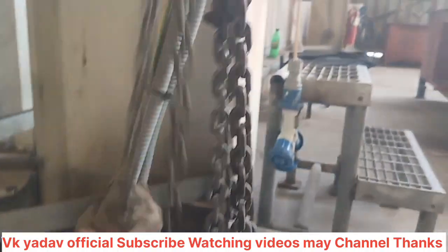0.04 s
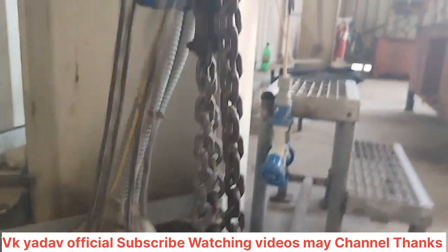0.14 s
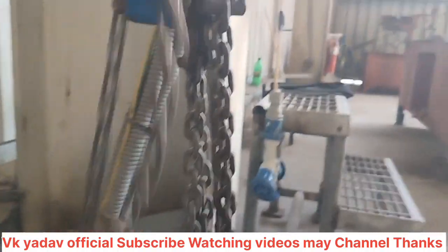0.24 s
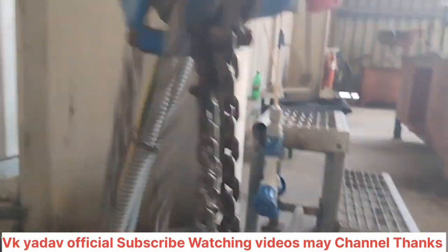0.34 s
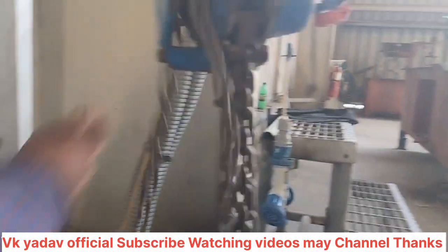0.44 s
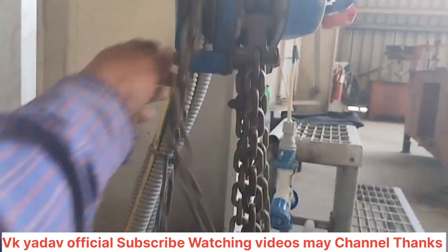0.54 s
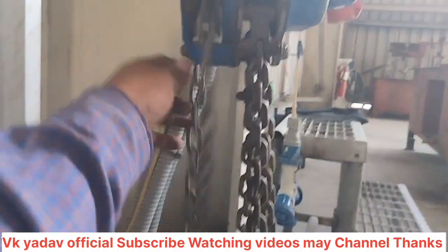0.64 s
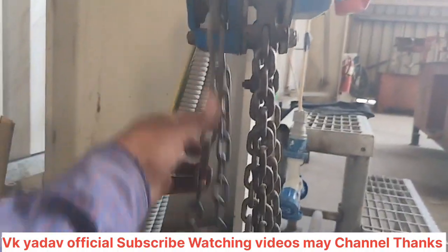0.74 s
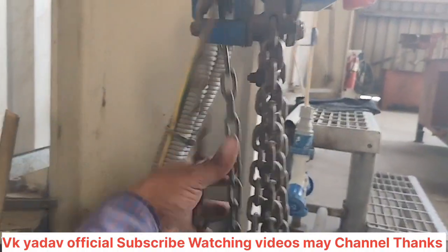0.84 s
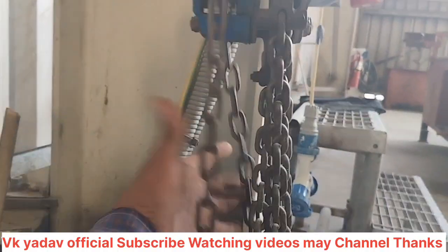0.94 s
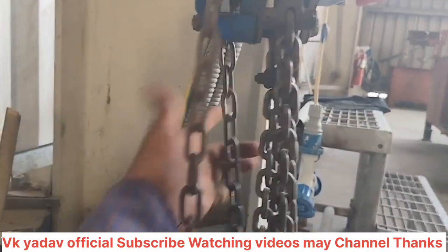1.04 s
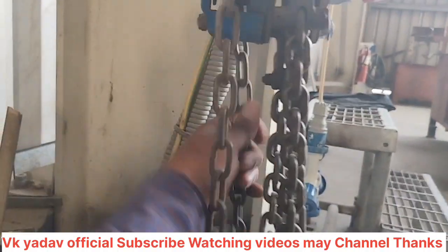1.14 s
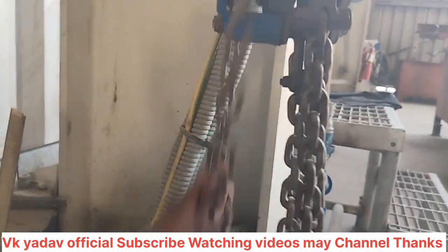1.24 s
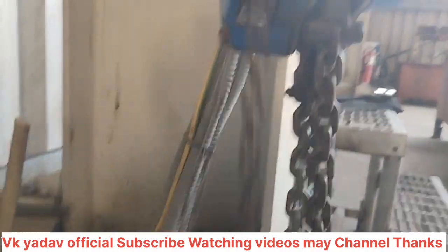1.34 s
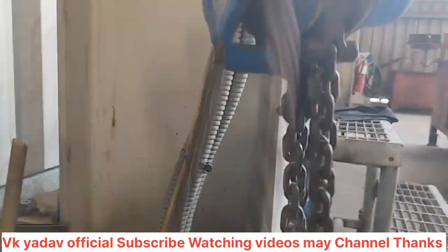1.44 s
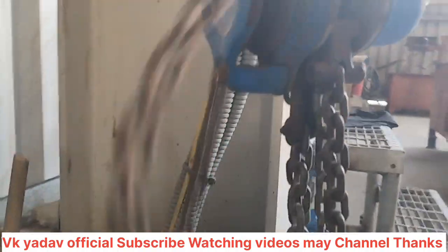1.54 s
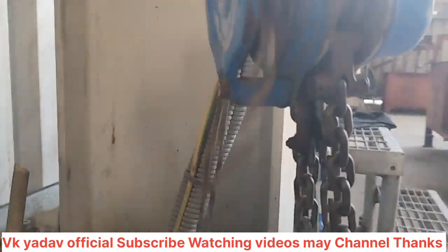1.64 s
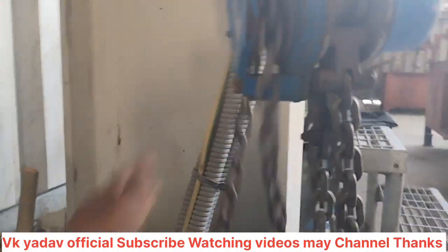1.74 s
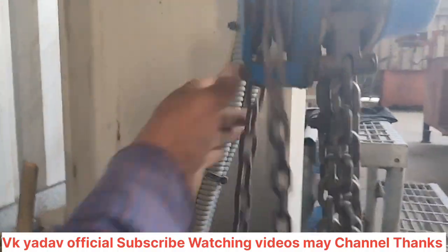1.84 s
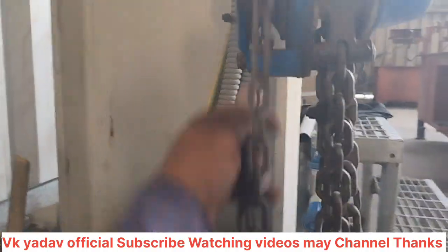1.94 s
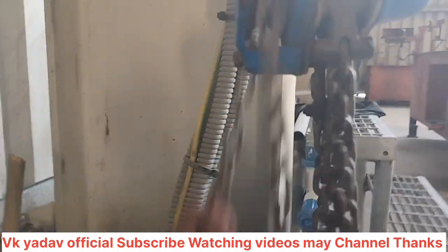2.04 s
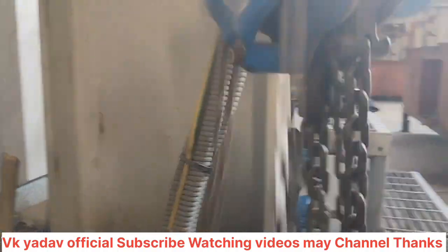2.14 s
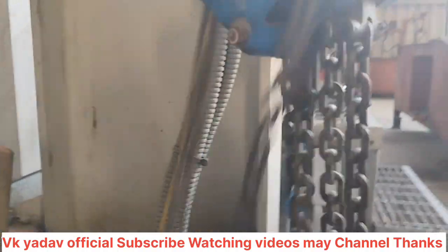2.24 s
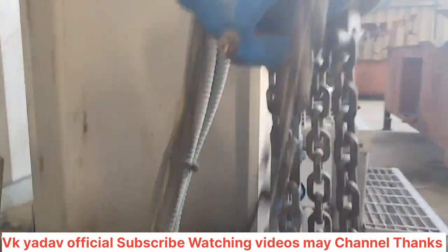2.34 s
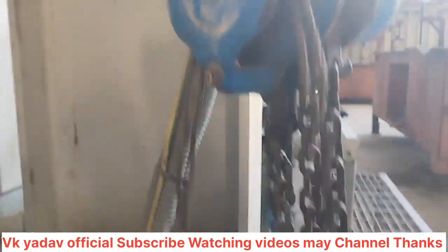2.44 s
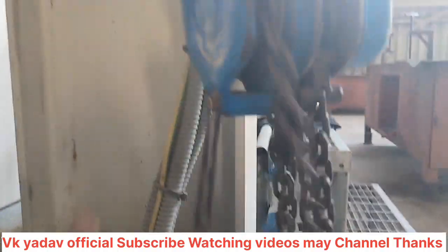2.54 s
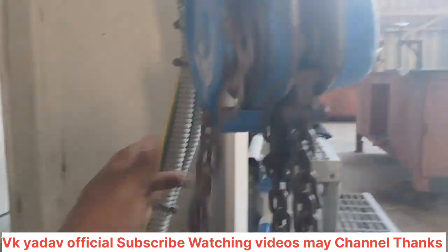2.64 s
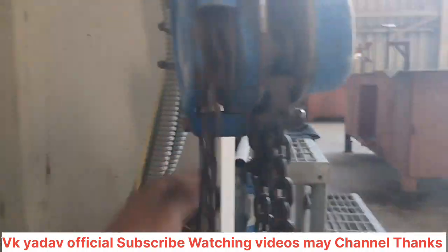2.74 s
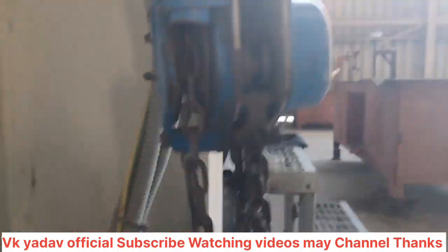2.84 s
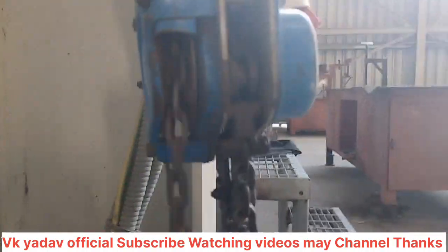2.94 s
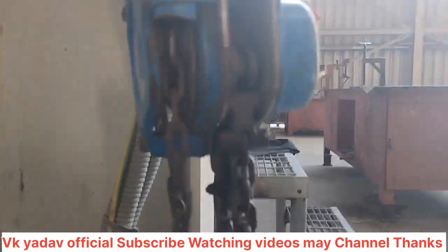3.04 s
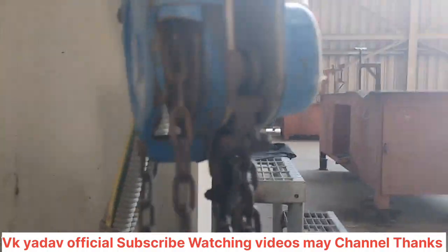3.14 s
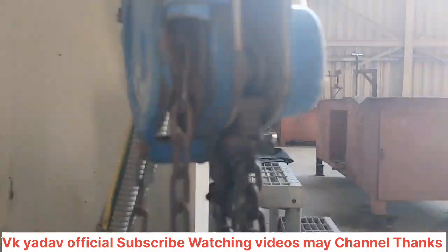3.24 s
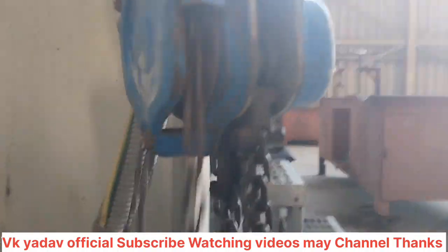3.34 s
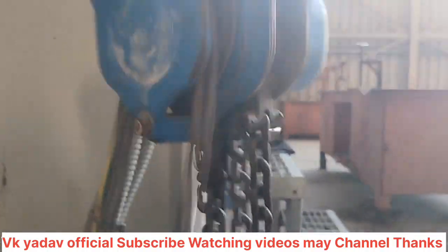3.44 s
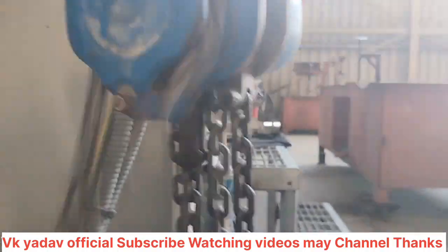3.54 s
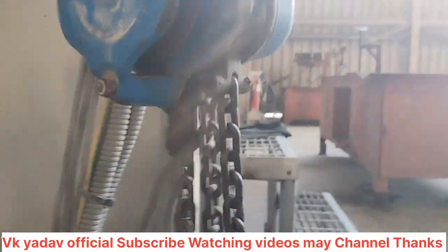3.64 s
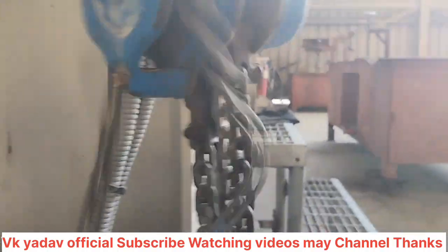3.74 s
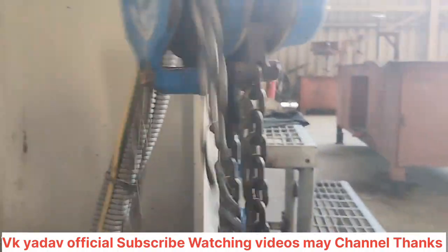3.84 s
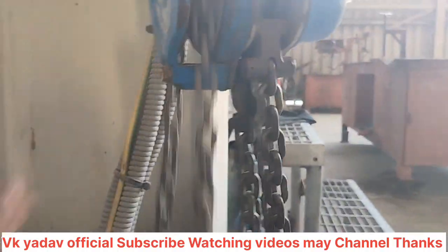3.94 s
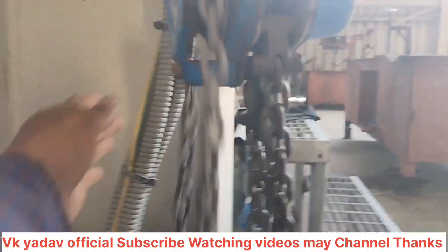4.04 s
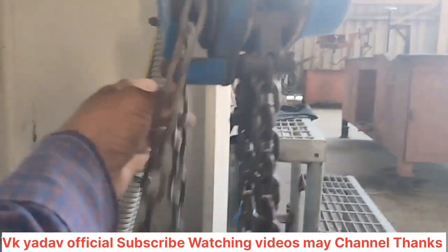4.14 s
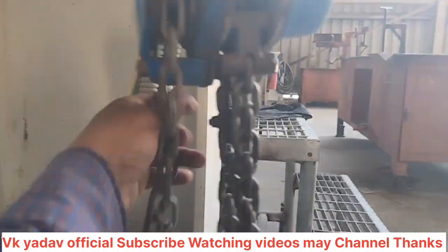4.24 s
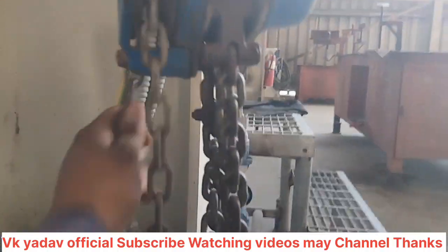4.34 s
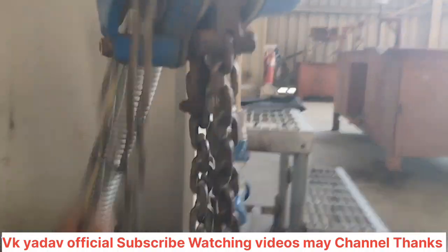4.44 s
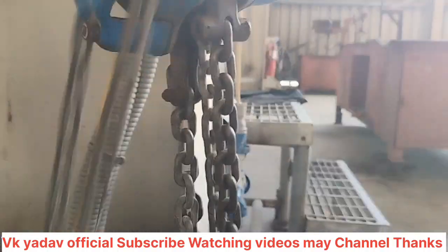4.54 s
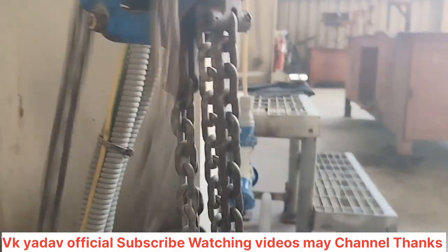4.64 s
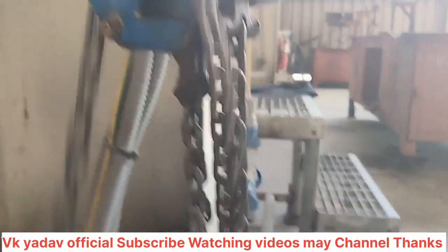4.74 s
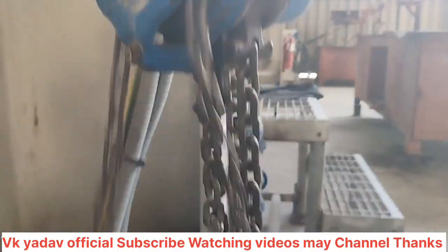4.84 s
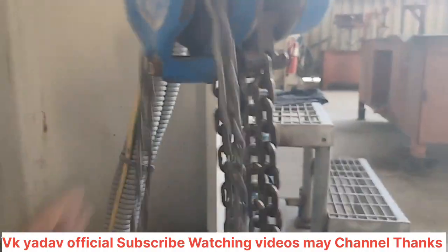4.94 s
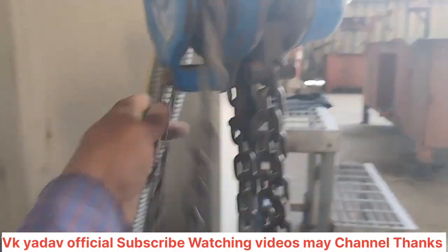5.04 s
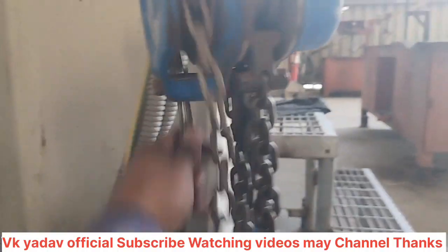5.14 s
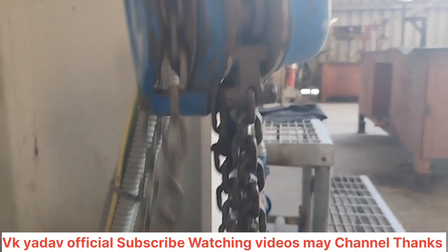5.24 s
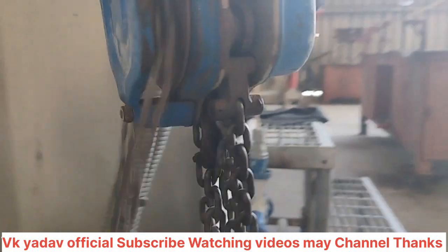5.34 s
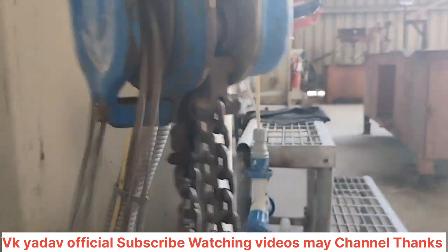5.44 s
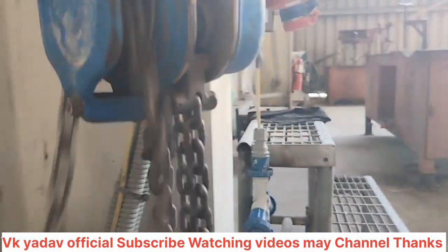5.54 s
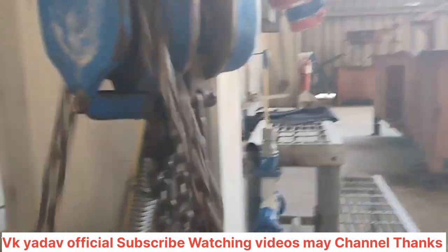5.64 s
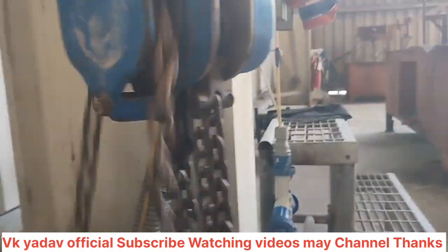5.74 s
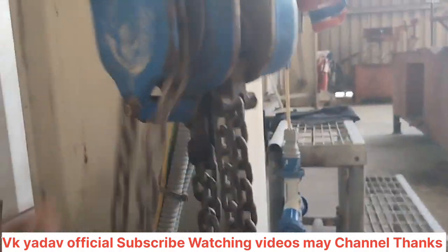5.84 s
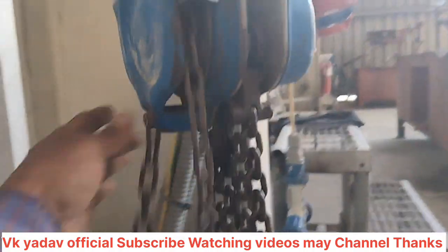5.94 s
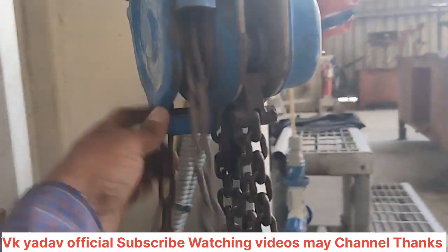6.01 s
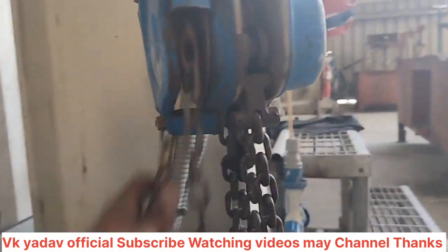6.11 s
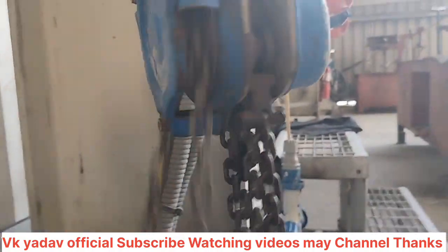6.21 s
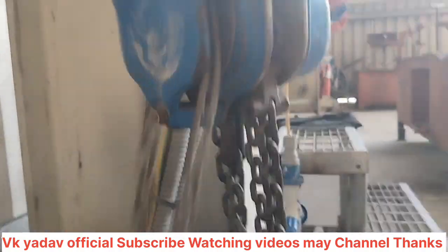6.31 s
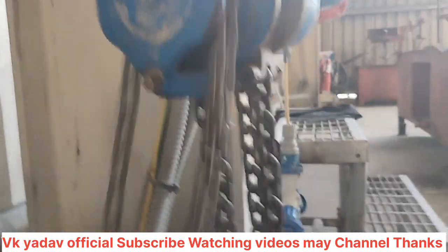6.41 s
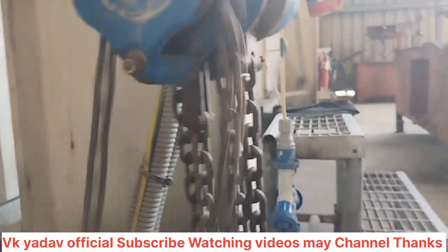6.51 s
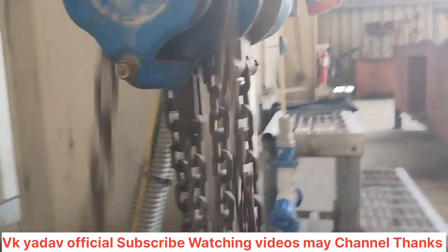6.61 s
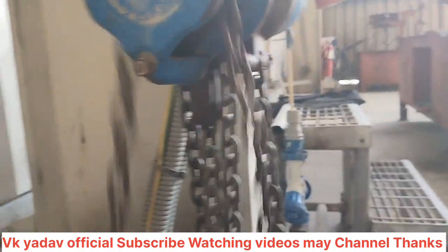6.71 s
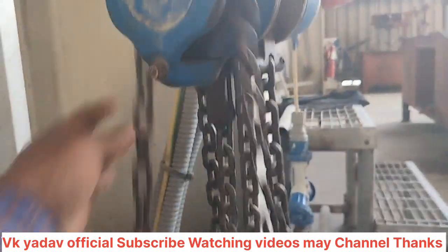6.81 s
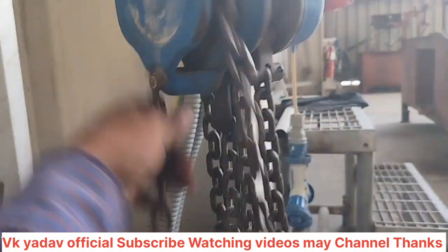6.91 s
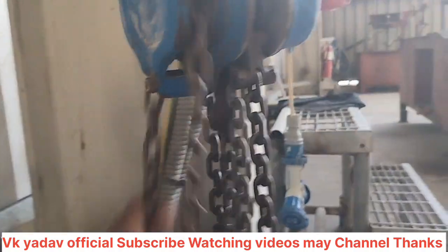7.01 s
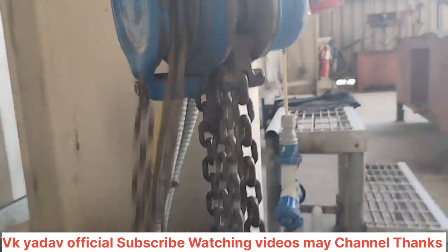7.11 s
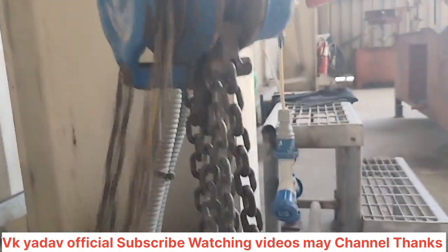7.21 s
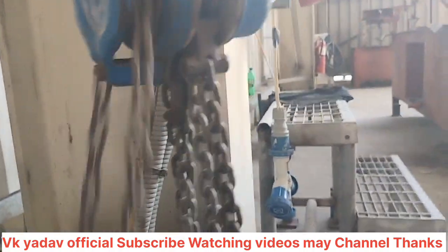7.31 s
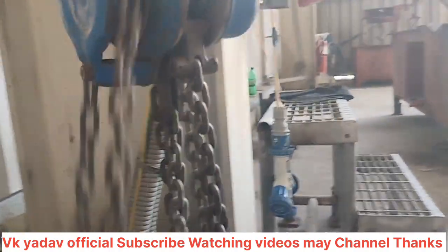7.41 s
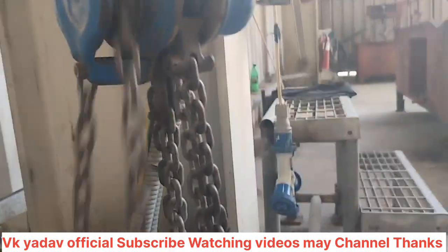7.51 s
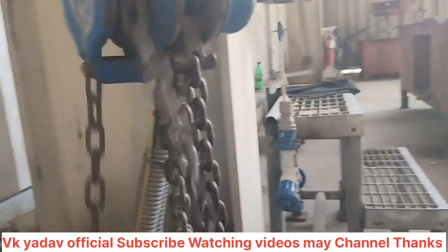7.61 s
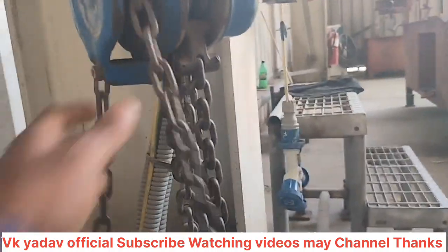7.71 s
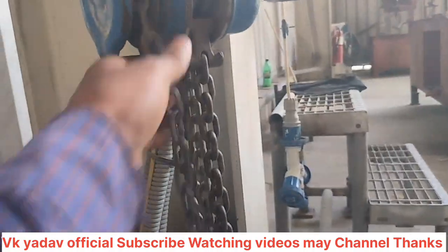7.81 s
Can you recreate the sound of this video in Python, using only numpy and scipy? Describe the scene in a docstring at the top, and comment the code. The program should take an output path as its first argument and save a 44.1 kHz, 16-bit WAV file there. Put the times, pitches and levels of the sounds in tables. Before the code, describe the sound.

A steel hand chain rattles and clinks through a manual hoist in repeated pulls, close up in a workshop.

```python
"""Hand chain on a workshop hoist

A steel chain is pulled again and again over the wheel of a manual hoist. Links clink on each other,
slap the thin wheel cover and drop into the wheel's pockets with dull thuds; far-off machines murmur.
Heard close up on a phone, the hoist nearer the left microphone. It starts abruptly out of silence."""
import sys
import numpy as np
from scipy import signal
from scipy.fft import rfft, irfft, next_fast_len
from scipy.io import wavfile
from scipy.ndimage import uniform_filter1d

SR = 44100
rng = np.random.default_rng(int(sys.argv[2]) if len(sys.argv) > 2 else 0)


def dump(signal):
    """Clip the signal to [-1, 1] and save it as 16-bit WAV at the path in sys.argv[1]."""
    limited = np.clip(np.atleast_2d(signal).T, -1, 1)
    pcm = np.round(limited * 32767).astype(np.int16)
    wavfile.write(sys.argv[1], SR, pcm)


N = 346887

# Pitches of the wheel cover's eight modes, in Hz.
COVER_MODE_HZ = [880, 1180, 1385, 1553, 1868, 2165, 2264, 2835]
# The same modes. Each row: relative level in dB, seconds to die away by 60 dB (t60).
COVER_RING = [(-7, 0.086), (-7, 0.048), (-6.5, 0.13), (-1.5, 0.36), (-0.5, 0.2), (-3, 0.12), (-2, 0.39),
              (-18, 0.11)]


def amp(db):
    return 10 ** (np.asarray(db) / 20)


def unit(x):
    """Scales to an energy of 1."""
    return x / np.sqrt(np.sum(x ** 2) + 1e-20)


def add(mix, start_s, sound):
    part = mix[:, round(start_s * SR):][:, :sound.shape[1]]
    part += sound[:, :part.shape[1]]


def coloured(x, points):
    """Filters by a spectrum of (Hz, dB) points."""
    size = next_fast_len(x.shape[-1])
    hz, db = np.transpose(points)
    gain = amp(np.interp(np.log(np.fft.rfftfreq(size, 1 / SR) + 1), np.log(hz + 1), db))
    return irfft(rfft(x, size) * gain, size)[..., :x.shape[-1]]


def swell(t, full_s, held_s, db, rise, sag, fall):
    """A level in dB that rises to full, sags, and falls away after the hold (slopes in dB/s)."""
    late = t - full_s
    return db + rise * np.minimum(late, 0) - sag * np.maximum(late, 0) - fall * np.maximum(late - held_s, 0)


def ring(modes, detune, spread_db, phase_spread, contact_s, tick_db, ring_share=1, lift_db=0):
    """One blow on metal, at a chance place and pitch: a tap and scrape drive the modes, with a tick."""
    hz, db, t60 = np.transpose(modes)[:, :, None]
    t = np.arange(int(.8 * t60.max() * min(ring_share, 1) * SR) + 1024) / SR
    pitch, place, phase, skew, side = rng.standard_normal((5, len(hz), 1))
    angle = 2 * np.pi * (hz * (1 + detune * pitch) * t + phase)
    level = amp(db + lift_db + spread_db * place - 60 * t / (t60 * np.clip(ring_share, .2, 1.2)))
    # each mode reaches the two microphones with a different phase and strength
    left = (level * amp(3.2 * side) * np.sin(angle + phase_spread * skew)).sum(0)
    right = (level * amp(-3.2 * side) * np.sin(angle)).sum(0)
    noise = rng.standard_normal((3, 1024))
    contact = np.exp(-(t[:1024] / contact_s) ** 1.2) * (1 - np.exp(-t[:1024] / .0012))
    drive = unit(noise[:1] * contact) + 0.63 * (np.arange(1024) == 30)
    sound = unit(signal.fftconvolve(np.array([left, right]), drive, axes=1)[:, :len(t)])
    tick = unit(np.diff(noise[1:] + 0.028 * noise[1], prepend=0) * contact)
    sound[:, :1024] += amp(tick_db) * tick
    return sound


def shower(level_db, per_s, sounds, uneven_db, clump_db):
    """Blows at chance moments and of chance size, in clumps; their rms follows level_db."""
    clumps = uniform_filter1d(uniform_filter1d(rng.standard_normal(N), 500), 500)
    size = amp(uneven_db * np.minimum(rng.exponential(1, N), 3) + clump_db * clumps / clumps.std())
    size *= amp(level_db) * np.sqrt(2 * SR / per_s / np.mean(size ** 2))
    which, out = rng.integers(0, len(sounds), N), np.zeros((2, N))
    for at in np.flatnonzero(rng.random(N) < per_s / SR):
        add(out, at / SR, size[at] * sounds[which[at]])
    return out


def hall():
    """Steady murmur of machines far off in the workshop, partly alike at both microphones."""
    # Each row: frequency in Hz, relative level in dB.
    spectrum = [(25, -1.5), (60, -2.5), (92, -6), (130, -12), (500, -33.5), (1800, -12), (3600, -10),
                (5000, -51), (16000, -64)]
    a, b = rng.standard_normal((2, N))
    murmur = coloured(np.array([a, 0.77 * a + 0.82 * b]), spectrum)
    return amp(-44) * np.sqrt(2 * N) * unit(murmur)


def walls(x, t60):
    """A near wall and a short tail: sparse echoes of random sign, different at each microphone."""
    t = np.arange(SR // 2) / SR
    taps = rng.choice([-1., 1.], (2, len(t))) * (rng.random((2, len(t))) < 2000 / SR) * (t > .003)
    return signal.oaconvolve(x, np.sqrt(2) * unit(taps * amp(-60 * t / t60)), axes=1)[:, :N]


def rattle_db(part):
    """Level over time of the links, cover or wheel: pulls, swings and rest add in power."""
    # Pulls. Each row: grab, run-up and hold in seconds; levels in dB of the links, the cover at the
    # grab, the cover while running and the wheel; run-down of the wheel and settling of links in dB/s.
    pulls = [(0.599, 0.045, 0.25, -23.5, -60, -38.5, -58, 81, 67),
             (1.499, 0.11, 0.26, -12.5, -28, -30.5, -28.5, 302, 100),
             (2.28, 0.16, .17, -15, -21, -30, -27, 180, 128),
             (3.592, 0.089, 0.29, -12, -46, -21, -24.5, 134, 0.5),
             (4.679, 0.09, 0.064, -15.5, -45, -20, -23.5, 63, 7),
             (5.537, 0.045, 0.5, -17, -21, -26, -30.5, 280, 64),
             (6.439, 0.077, 0.2, -14.5, -14, -23, -28.5, 60, -5),
             (7.306, 0.14, 0.044, -18, -21, -44, -28.5, 89, 31)]
    # The slack chain swings. Each row: time and hold in seconds, links and cover levels in dB.
    swings = [(0.858, 0.0034, -26, -28), (0.961, 0.062, -33, -33), (1.2, 0.17, -47, -39),
              (1.998, 0.041, -34, -60), (2.17, 0.014, -27, -29.5), (2.751, 0.083, -25, -54),
              (2.897, 0.075, -23, -29), (3.1, 0.033, -35, -50), (4.298, 0.077, -44, -36),
              (5.069, 0.038, -20, -33.5), (5.43, .02, -29, -59), (5.9, 0.053, -16.5, -55),
              (6.088, 0.0065, -17.5, -34), (6.2, 0.16, -33, -37), (6.9, 0.0061, -17.5, -33),
              (7.119, 0.01, -22, -29), (7.62, 0.028, -21, -44)]
    # Levels in dB of links, cover and wheel with the chain hanging still.
    rest_db = [-76, -48.5, -64]
    t = np.arange(0, N / SR + .01, .002)
    grab, run_up, held, link_db, jerk_db, run_db, wheel_db, coast, settle = np.transpose(pulls)[:, :, None]
    swing_s, swing_held, jangle_db, brush_db = np.transpose(swings)[:, :, None]
    swing = swell(t, swing_s, swing_held, 0, rise=189, sag=0, fall=194)
    turning = swell(t, grab + run_up, held, 0, rise=201, sag=14.5, fall=coast)
    haul = swell(t, grab, run_up + held, link_db, rise=328, sag=28, fall=settle)
    jerk = swell(t, grab, 0, jerk_db, rise=328, sag=0, fall=112)
    layers, floor_db = {"links": ([haul, swing + jangle_db], rest_db[0]),
                        "cover": ([jerk, turning + run_db, swing + brush_db], rest_db[1]),
                        "wheel": ([turning + wheel_db], rest_db[2])}[part]
    power = (amp(np.concatenate(layers)) ** 2).sum(0) + amp(floor_db) ** 2
    return np.interp(np.arange(N) / SR, t, 10 * np.log10(power))


def thud(fade_s):
    """A dull unpitched blow through the heavy casting, louder at the left microphone."""
    # Each row: frequency in Hz, relative level in dB.
    spectrum = [(25, -9), (60, 3.5), (120, -3.5), (240, -2), (305, -0.5), (390, -11), (550, -12),
                (1000, -13), (4000, -12.5), (16000, -43)]
    t = np.arange(1536) / SR
    noise = coloured(rng.standard_normal((2, len(t))), spectrum)
    return unit(noise * (1 - np.exp(-t / 0.0043)) * np.exp(-t / fade_s)) * amp([[2.], [-2.]])


def wheel():
    """Links seat in the turning wheel's pockets: a thud in the casting, a dry clack, a singing rim."""
    # Modes of a nearly dead pocket and of the rim. Each row: pitch in Hz, level in dB, t60 in seconds.
    pocket_modes = [(726, -13, 0.014), (964, -4, 0.043), (1464, -2, 0.035), (1927, 1.5, 0.023),
                    (2385, 10, 0.0064), (3060, 5, 0.0043)]
    rim_modes = [(935, -8, .4), (1553, -3, .4), (2264, 0, .4)]
    # Links seating heavily. Each row: start in seconds, relative peak in dB.
    heavy_seats = [(0.598, -18.5), (0.742, -22), (1.501, -6.5), (1.939, -26), (2.295, -12), (2.333, -9),
                   (2.838, -21), (3.085, -18.5), (3.606, -9), (5.021, -9), (5.186, -15.5), (5.404, -21),
                   (5.501, -11.5), (6.065, -13), (6.933, -9), (7.099, -13.5), (7.274, -16), (7.669, -9)]
    level_db = rattle_db("wheel")
    thuds = [thud(fade_s=0.0019) for _ in range(40)]
    out = shower(level_db + 8.5, 160., thuds, uneven_db=3.0, clump_db=3.1)
    clacks = [ring(pocket_modes, 0.11, 3.15, 1.9, contact_s=0.0014, tick_db=0.5) for _ in range(50)]
    out += shower(level_db + 8.0, 380., clacks, uneven_db=3.7, clump_db=3.3)
    pings = [ring(rim_modes, 0.00062, 2.5, 2.0, contact_s=0.00067, tick_db=-28) for _ in range(16)]
    out += shower(level_db - 8, 50., pings, uneven_db=3.0, clump_db=3.0)
    for start_s, peak_db in heavy_seats:
        sound = thud(fade_s=0.0068)
        add(out, start_s, amp(peak_db) * sound / abs(sound).max())
    return out


def slap(long_db, ring_share):
    """The chain hits the cover with a snap; four long modes ring at long_db, the rest follow the loudest."""
    # Phase lead of each mode at the left microphone, in radians.
    left_lead = [0, 0, 0, 0, -.9, 0, -1.5, 0]
    db, t60 = np.transpose(COVER_RING)[:, :, None]
    db = db + max(long_db)
    db[3:7, 0] = long_db
    t = np.arange(SR // 3) / SR
    phase, skew, side = rng.standard_normal((3, len(db), 1))
    angle = 2 * np.pi * (np.c_[COVER_MODE_HZ] * t + phase)
    onset = 1 - np.exp(-t / 0.0012)  # the ring swells while the chain lies on
    level = amp(db - 60 * t / (t60 * np.clip(ring_share, .2, 1.3))) * onset
    left = (level * amp(1.5 * side) * np.sin(angle + np.c_[left_lead] + .4 * skew)).sum(0)
    right = (level * amp(-1.5 * side) * np.sin(angle)).sum(0)
    snap = rng.standard_normal((2, len(t))) * np.exp(-t / .008) * (1 - np.exp(-t / 0.0008))
    return np.array([left, right]) + amp(max(long_db) - 4) * np.diff(snap, prepend=0)


def cover():
    """Thin pressed steel rings with few long modes; the place of each slap sets their levels."""
    # Each row: start in seconds, levels of the four long modes (low to high) in dB, share of ring time.
    slaps = [(0.601, -60, -28.5, -39, -28, 0.86), (0.7467, -25, -22.5, -38, -18, 0.59),
             (0.8563, -17.5, -13.5, -26, -43, 0.67), (1.72, -26, -19, -25, -16, 1),
             (1.8433, -16.5, -12, -16, -10.5, 0.67), (2.13, -21, -23, -41, -42, 1),
             (2.1959, -19, -25, -31, -45, 0.57), (2.2579, -8.5, -28, -32, -16, 0.95),
             (2.805, -20.5, -15.5, -32, -26, 0.8), (2.8804, -32, -14, -13, -12.5, 0.36),
             (2.935, -15, -10.5, -34, -20, 0.67), (2.9866, -22, -36, -39, -47, 0.39),
             (3.1385, -29, -15, -24, -37, 0.42), (3.542, -35, -17, -38, -35, 0.73),
             (3.775, -20, -10, -26, -15.5, 0.94), (4.0179, -34, -35, -35, -22, 1),
             (4.865, -21, -17, -25, -20, 0.66), (5.384, -23, -27, -54, -24, 0.61),
             (5.973, -20, -23, -14, -19.5, 0.54), (6.0662, -23.5, -21, -17.5, -25.5, 0.79),
             (6.2546, -11, -5, -10.5, -32, 0.54), (6.3281, -16.5, -20, -26, -25, 0.6),
             (6.4016, -24, -9, -17, -6.5, 0.42), (6.6794, -22, -26, -33, -14, 0.66),
             (7.1129, -13.5, -13.5, -16, -31, 0.98), (7.289, -14, -32, -20, -34, 0.81),
             (7.551, -15, -8, -14, -32, 0.46), (7.6323, -24, -12, -33, -19.5, 0.34),
             (7.7, -27, -19.5, -38, -21.5, 0.39)]
    modes = np.column_stack([COVER_MODE_HZ, COVER_RING])
    taps = [ring(modes, 0.0053, 4.2, 1.0, contact_s=0.01, tick_db=-11.5, ring_share=0.23)
            for _ in range(20)]
    out = shower(rattle_db("cover"), 110., taps, uneven_db=0.77, clump_db=2.6)
    for start_s, *long_db, ring_share in slaps:
        add(out, start_s, slap(long_db, ring_share))
    return np.array([out[0], np.roll(out[1], 3)])  # the cover faces further left: 3 samples more lag


def links():
    """Steel links, each tuned a little differently, clink together; the harder the pull, the more collide."""
    # Modes of one link. Each row: pitch in Hz, relative level in dB.
    link_modes = [(2750, 0), (3480, 8.5), (3780, 6.5), (4050, -3), (5210, 1), (5780, -3.5), (6550, -8),
                  (7100, 6.5), (7560, -4), (7980, -6.5), (9190, -2), (9780, 9), (10900, -6), (12700, 3.5),
                  (13280, -2), (14500, -17)]
    # Single strikes. Each row: start in seconds, relative peak in dB, lift above 6.4 kHz in dB.
    clinks = [(0.5975, -22, -16), (0.6353, -14, -4), (0.7714, -6.5, -8), (0.8358, -8.5, -2), (0.86, -8, 10),
              (0.996, -5.5, 4), (1.079, -15.5, -4), (1.1037, -10.5, 4), (1.195, -12, -6), (1.3432, -17, 4),
              (1.4364, -6.5, -1), (1.488, -5.5, -16), (1.5361, 3.5, -28), (1.558, -6, -14),
              (1.6689, -1, -6), (2.047, -11.5, -3), (2.128, -13.5, 4), (2.168, -30, 8), (2.189, -6.5, 11),
              (2.2575, -3, 9), (2.3326, -1, -24), (2.388, 2, -2), (2.486, -2, -5), (2.642, -4.5, -13),
              (2.7023, -6, -2), (2.728, -7.5, -11), (2.7643, -8.5, -22), (2.7917, -2, -6),
              (2.836, -9.5, -2), (2.879, -8.5, -21), (2.93, 1.5, -2.5), (3.025, -14, 29), (3.135, -18, 15),
              (3.301, -14.5, 7), (3.356, -9.5, 1), (3.479, -9.5, 8), (3.5596, -5, -10), (4.269, -11, 1),
              (4.3052, -10, 16), (4.342, -5.5, 4), (4.4076, -7, 3.5), (4.5393, -15, -3), (4.6472, -5.5, -6),
              (4.9569, -14, -2), (5.0476, -3, -2), (5.153, -13.5, -5), (5.1988, -6.5, 0.5),
              (5.2749, -4.5, 0), (5.297, -6, -3), (5.386, -6.5, -2), (5.4202, -2.5, 1), (5.4563, -7, 2),
              (5.512, -2.5, -1.5), (6.0625, -3, 0), (6.251, -12, 23), (6.327, -4.5, 5), (6.3997, -4.5, 2),
              (6.805, -10.5, -2), (6.889, -2.5, -7), (6.945, -6.5, -2), (7.0043, -9, -2), (7.029, -6, -21),
              (7.0712, -4.5, -3.5), (7.109, -4.5, 25), (7.2425, -3, -9), (7.2836, -3.5, 2), (7.405, -12, 4),
              (7.7226, -4.5, -3.5)]
    hz, db = np.transpose(link_modes)
    t60 = .065 * (3500 / hz) ** .55  # neighbours damp a link, its high modes most
    modes = np.transpose([hz, db, t60])
    detune = np.where(hz[:, None] < 3600, .016, .006)
    level_db = rattle_db("links")
    hits_per_s = np.clip(220. * amp(0.5 * (level_db + 17.5)), 50, 1500)
    jingles = [ring(modes, detune, 5.15, 0.91, contact_s=0.0091, tick_db=-6.5, ring_share=0.51)
               for _ in range(60)]
    out = shower(level_db, hits_per_s, jingles, uneven_db=3.05, clump_db=0.81)
    for start_s, peak_db, treble_db in clinks:
        sound = ring(modes, detune, 3.14, 1.4, contact_s=0.0034, tick_db=-16, ring_share=0.32,
                     lift_db=(hz[:, None] > 6400) * treble_db)
        add(out, start_s, amp(peak_db) * sound / abs(sound).max())
    return out


def scene():
    """The hoist close by, its short echo off the walls, and the workshop behind."""
    hoist = (links() + cover()) * amp([[-.6], [.6]]) + wheel()
    hoist[1] = np.roll(hoist[1], 16)  # reaches the right microphone 16 samples later
    return hoist + amp(-3.5) * walls(hoist, t60=0.089) + hall()


def record(dry):
    """The phone: silence at first, no deepest bass, gain control and soft overload, a band limit."""
    start_s, low_cut_hz, top_hz = .597, 20, 15680
    gate = np.clip((np.arange(N) / SR - start_s) / 0.00066, 0, 1)
    heard = signal.lfilter(*signal.butter(1, low_cut_hz / (SR / 2), "high"), dry) * gate
    power_db = 10 * np.log10(abs(uniform_filter1d((heard ** 2).mean(0), 900)) + 1e-12)
    compressed = heard / amp(.5 * np.maximum(power_db + 15., 0))  # 2:1 above -15 dB
    saturated = 1.022 * np.tanh(compressed / 0.87)
    lowpass = signal.firwin(511, top_hz, window=("kaiser", 9), fs=SR)
    return np.clip(signal.oaconvolve(saturated, lowpass[None], "same"), -1, 1)


dry = scene()
out = record(dry)
dump(out)
```